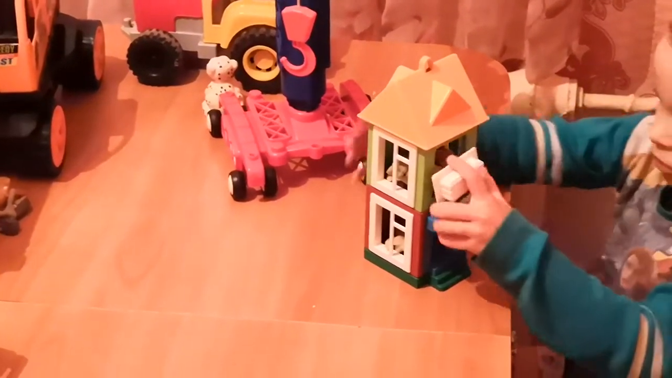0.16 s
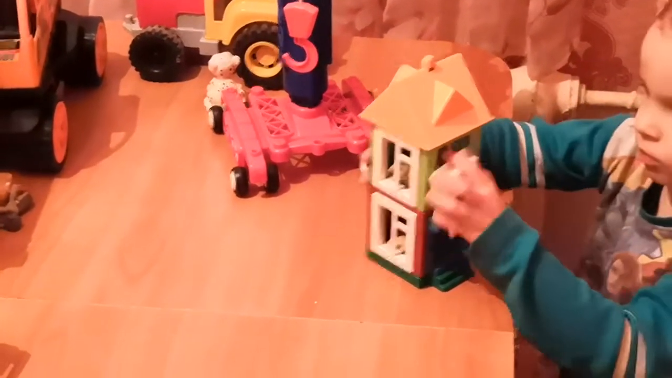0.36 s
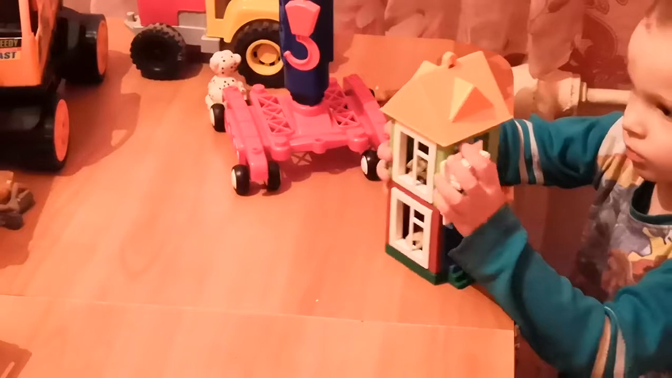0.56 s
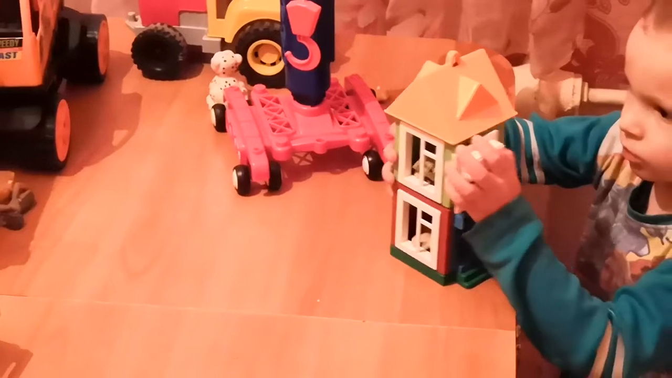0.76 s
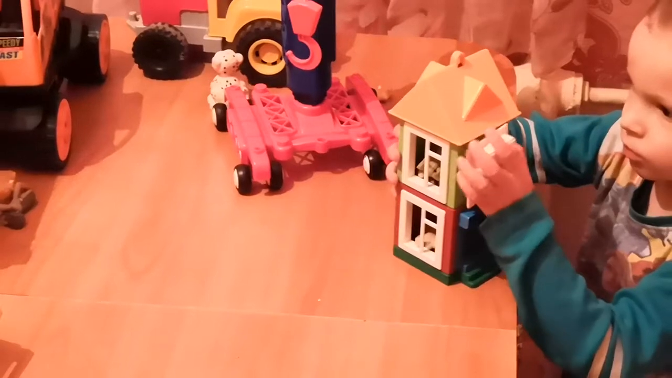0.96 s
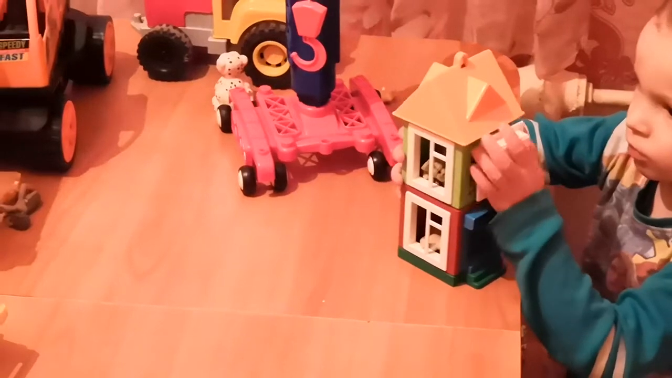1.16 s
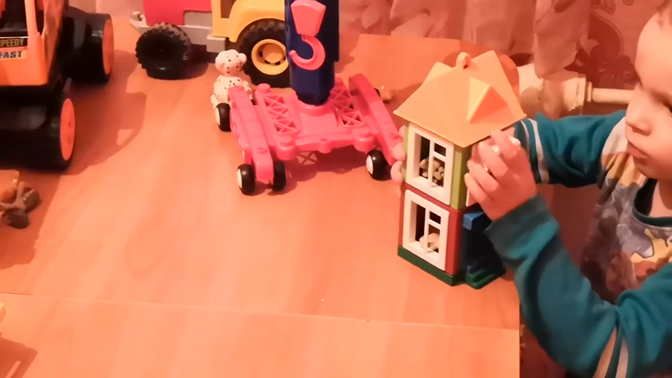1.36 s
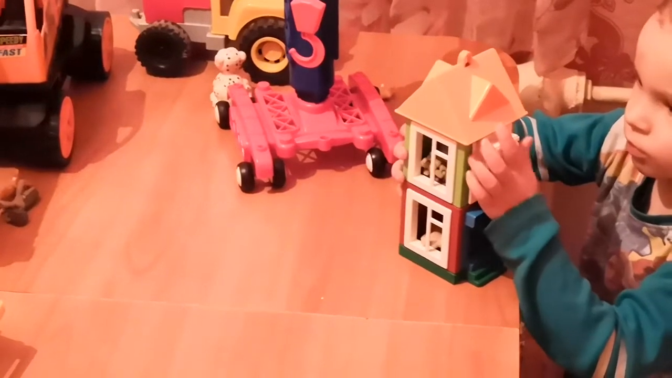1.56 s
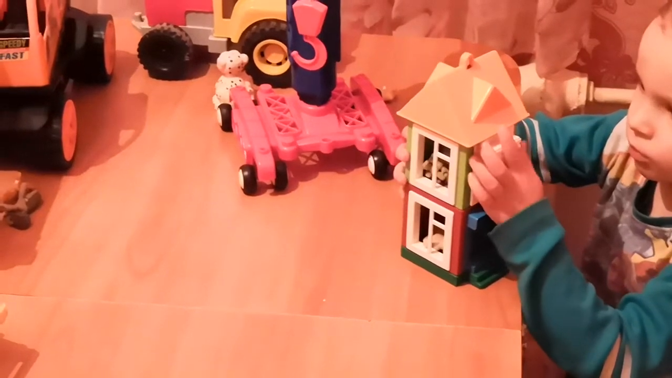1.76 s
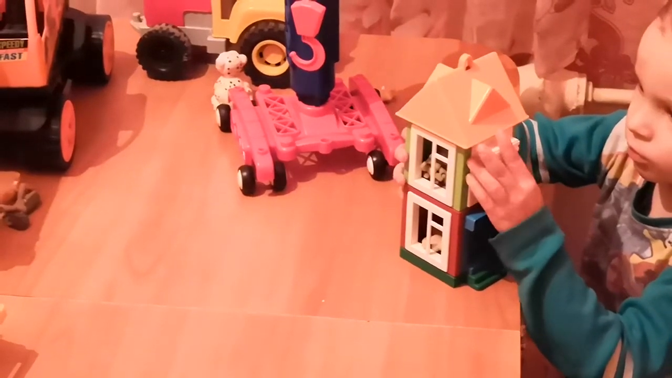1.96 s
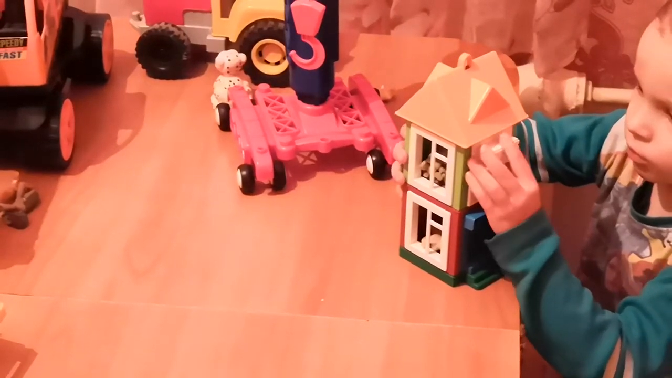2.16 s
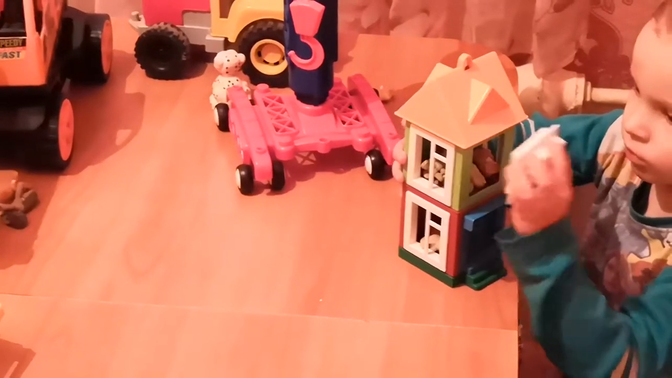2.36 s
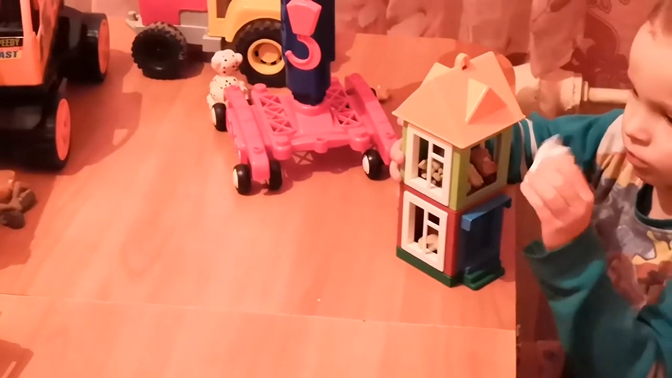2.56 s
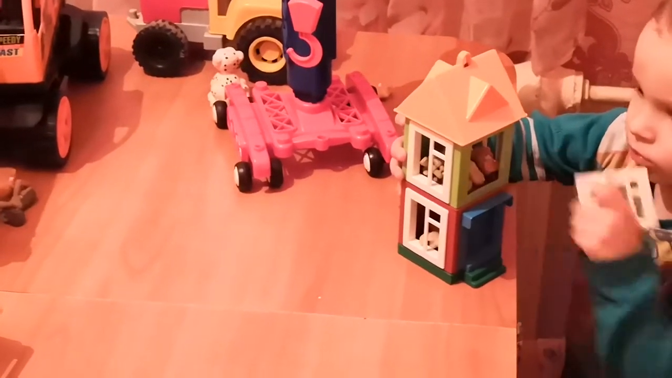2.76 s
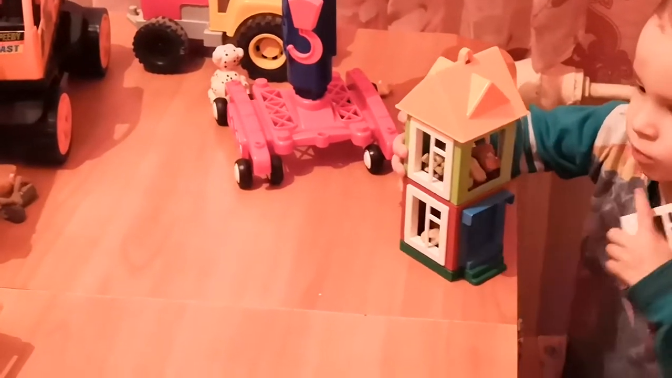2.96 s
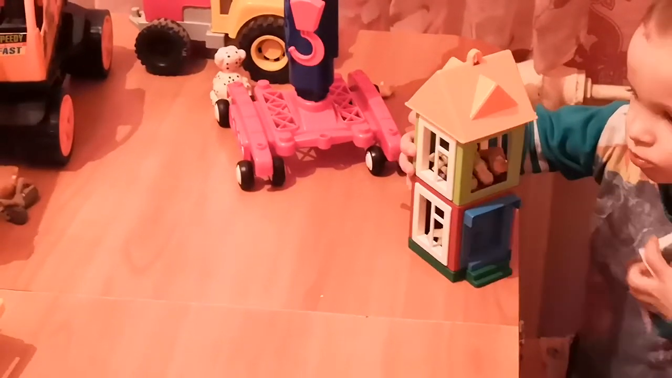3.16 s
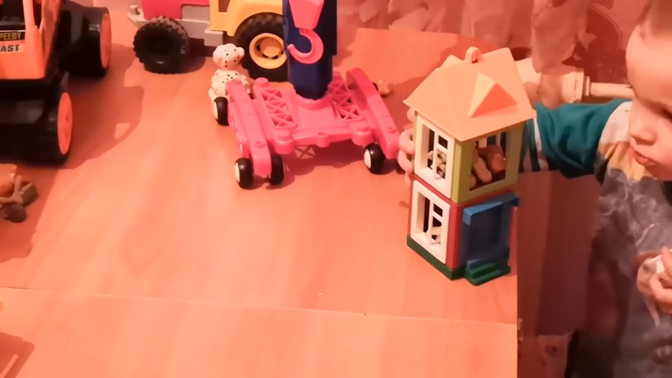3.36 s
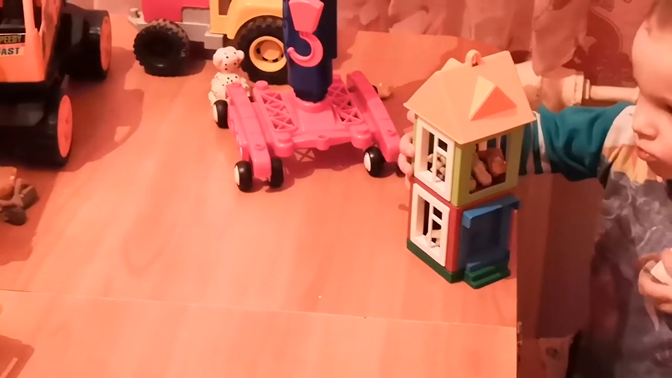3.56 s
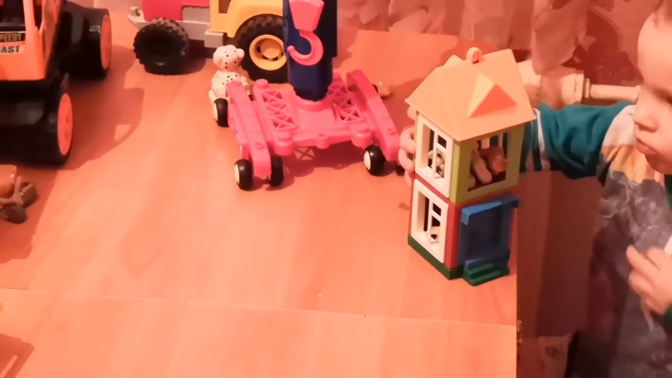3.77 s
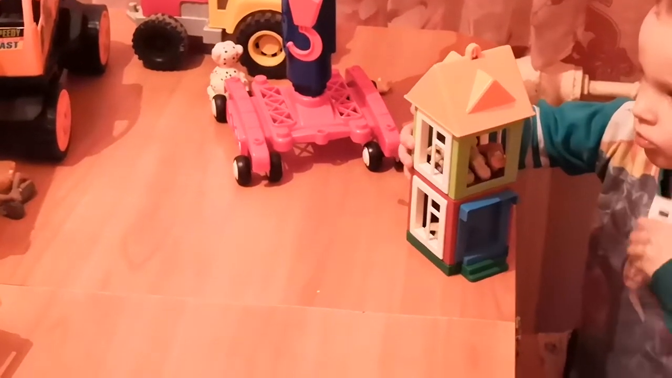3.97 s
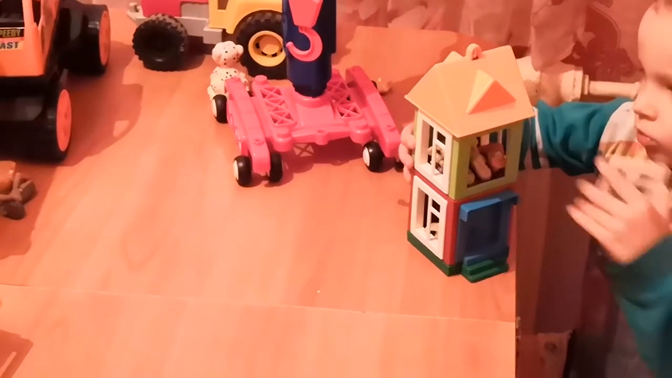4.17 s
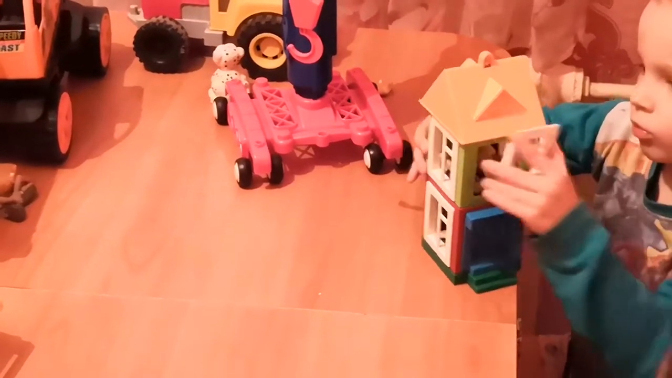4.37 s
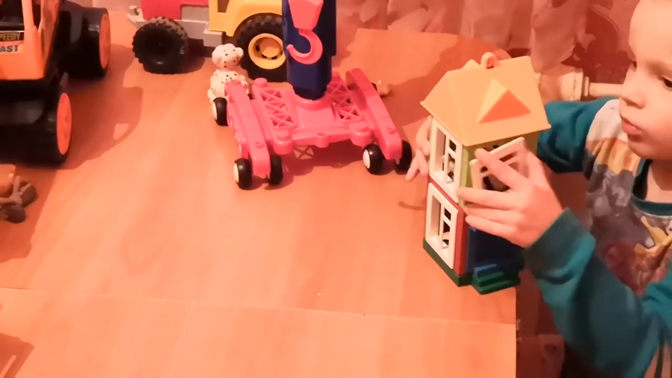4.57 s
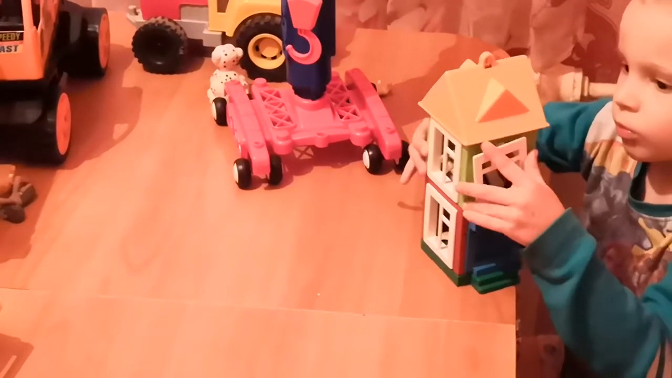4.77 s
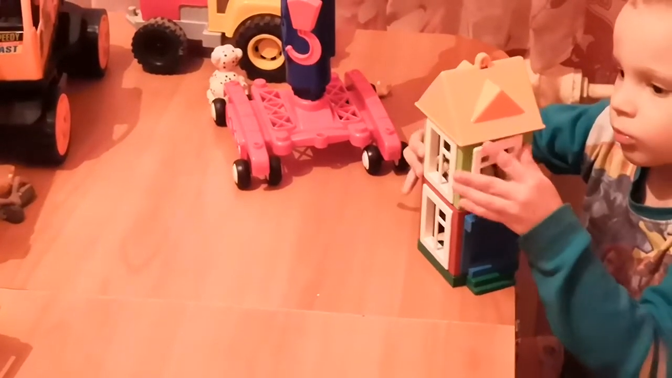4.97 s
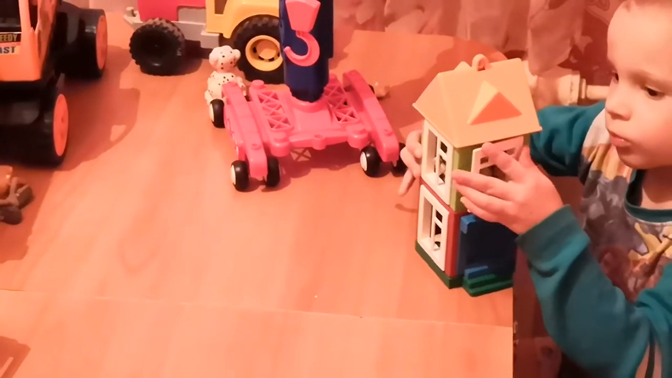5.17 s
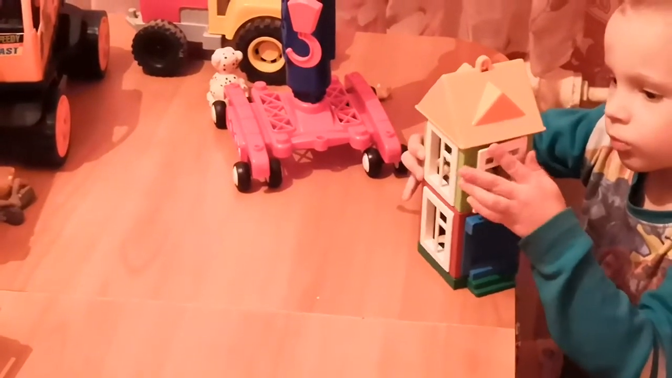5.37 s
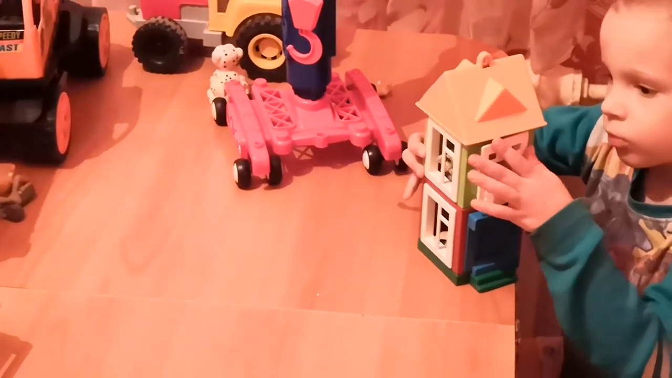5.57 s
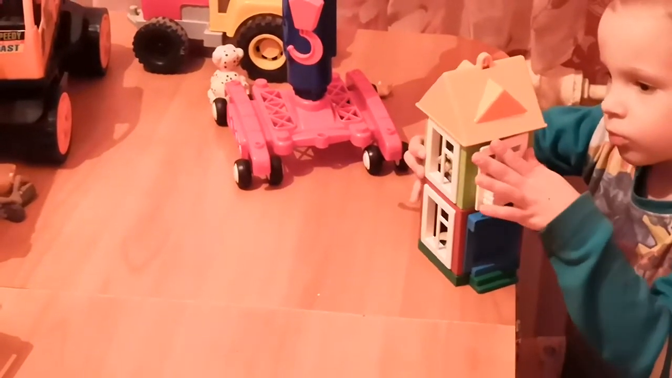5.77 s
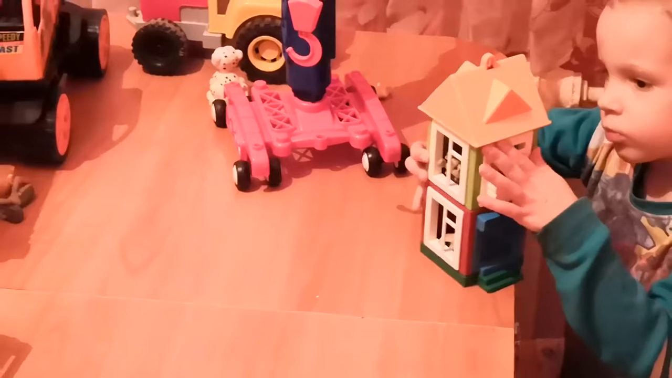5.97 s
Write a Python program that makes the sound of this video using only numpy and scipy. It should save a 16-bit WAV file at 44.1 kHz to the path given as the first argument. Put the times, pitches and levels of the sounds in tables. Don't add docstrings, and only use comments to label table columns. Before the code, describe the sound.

Small plastic frames click, snap and knock against a hollow plastic toy house on a wooden table, with soft scraping in a quiet room.

```python
import sys
import numpy as np
from scipy import signal
from scipy.fft import rfft, irfft, next_fast_len
from scipy.io import wavfile

SR = 44100
rng = np.random.default_rng(int(sys.argv[2]) if len(sys.argv) > 2 else 0)


def boost(x):
    u = np.asarray(x, float) / 20
    return 10 ** u


def transcribe(signal):
    frames = np.atleast_2d(signal).T
    limited = np.clip(frames, -1, 1)
    pcm = np.round(limited * 32767).astype(np.int16)
    wavfile.write(sys.argv[1], SR, pcm)


N = 265482

# (pitch [Hz], level [dB], time to die by 60 dB [s])
TABLE_MODES = [(65, -11, 0.034), (132.4, -11.5, 0.6), (158, -2, 0.098), (208.3, 3.5, 0.043),
               (270, -5.5, 0.11), (309.4, -11, 0.14), (355, -0.5, 0.029)]
# (pitch [Hz], level [dB], time to die by 60 dB [s])
HOLLOW_MODES = [(882, 2, 0.017), (1097, 1.5, 0.037), (1150, 1, 0.016), (1456, -1.5, 0.028),
                (1500, 12.5, 0.0043)]
# (pitch [Hz], level [dB], time to die by 60 dB [s])
SHELL_MODES = [(1863, 0, 0.022), (2000, -2.5, 0.012), (2520, 6, 0.0098), (2765, 0, 0.017),
               (2910, -7, 0.015), (3300, -15, 0.029), (3880, -3, 0.0033)]


def cut(x, hz, kind):
    return signal.sosfilt(signal.butter(4, hz, kind, fs=SR, output="sos"), x)


def at_hz(points, hz):
    points = np.array(points)
    return np.interp(np.log(hz), np.log(points[:, 0]), points[:, 1])


def rms_one(x):
    return x / np.sqrt(np.mean(x ** 2) + 1e-20)


def ring(force, hz, t60):
    r = boost(-60 / (t60 * SR))
    w = 2 * np.pi * hz / SR
    return signal.lfilter([0, np.sin(w)], [1, -2 * r * np.cos(w), r * r], force + 1e-18)


def tones(rows, rise_s=0.00067):
    out = np.zeros(N + SR)
    t = np.arange(SR // 5) / SR
    rise = np.minimum(t / rise_s, 1)
    for s, start_hz, end_hz, db, t60 in rows:
        turns = start_hz * t + (end_hz - start_hz) * t ** 2 / (2 * t[-1])
        out[int(s * SR):][:len(t)] += boost(db - 60 * t / t60) * np.sin(2 * np.pi * turns) * rise
    return out[:N]


def steady_tones(rows, rise_s):
    return tones([(s, hz, hz, db, t60) for s, hz, db, t60 in rows], rise_s)


def flicker(rate):
    knots = rng.standard_normal(int(N / SR * 40) + 2)
    smooth = signal.lfilter([1], [1, -np.exp(-2 * np.pi * min(rate, 19) / 40)], knots)
    return np.interp(np.linspace(0, len(knots) - 1, N), np.arange(len(knots)), rms_one(smooth))


def grains(per_s, spread_db):
    sizes = boost(spread_db * np.minimum(rng.exponential(1, N), 5)) * rng.choice([-1, 1], N)
    return sizes * (rng.random(N) < per_s / SR)


def strokes(rows):
    t = np.arange(0, N, 32) / SR
    db = -95
    for s, hold_s, top_db, rise_s, fall_s in rows:
        before = (s - t) / max(rise_s, .004)
        after = (t - s - hold_s) / max(fall_s, .004)
        away = np.maximum(np.maximum(before, after), 0)
        db = np.maximum(db, top_db - 20 * away)
    return boost(np.interp(np.arange(N) / SR, t, db))


def knocks():
    # (time [s], peak [dB], table thud [dB], hard edge [dB], piece pitch [Hz])
    presses = [(0.2575, -42, -11, -38, 2920), (0.305, -29, -9, -45, 1940), (0.3298, -36, -6, -43, 1560),
               (0.3591, -36.5, -28, -22.5, 2470), (0.4915, -40.5, -15, -20, 990),
               (0.633, -39.5, -14, -33, 1606), (0.7004, -68.5, 6.5, -4, 1540),
               (0.7741, -58.5, -4, -14.5, 2630), (0.9726, -52, -14.5, -23, 1410),
               (1.0156, -47, -18.5, -15.5, 1500), (1.1415, -58, -8, -22, 2680),
               (1.2273, -34.5, -13.5, -10, 2560), (1.8701, -60.5, -18, -16, 2760),
               (2.145, -47.5, -12, -54, 1260), (2.164, -40.5, -9.5, -47, 2370),
               (2.2639, -33, 1, -23.5, 1150), (3.309, -75.5, 5, -11, 1320), (4.337, -36, -43, -17.5, 1420),
               (4.5138, -37, -14.5, -14.5, 1220), (4.9105, -34, -48, -8.5, 1900),
               (5.1362, -34, -17.5, -15.5, 1370), (5.412, -61, 4, -28, 1040),
               (5.8067, -21.5, -28, -11, 2800)]
    # (time [s], peak [dB], table thud [dB], hard edge [dB], piece pitch [Hz])
    bumps = [
        (0.0, -57, -4, -15.5, 1410),
        (0.3985, -47.5, -0.5, -10.5, 1070),
        (0.7476, -60.5, -6, -14.5, 1070),
        (0.8694, -77.5, 10, -7, 900),
        (1.2074, -56.5, 8, -14, 1420),
        (1.447, -57.5, -0.5, -34, 1440),
        (2.2577, -45.5, 14, -15.5, 1000),
        (4.4823, -55.5, -39, -37, 970),
        (4.7075, -54.5, -6.5, -5, 1740),
    ]
    # (time [s], peak [dB], table thud [dB], hard edge [dB], piece pitch [Hz])
    ticks = [(0.1037, -60, -6.5, -21, 1650), (0.2975, -37, -19, -23, 2130), (0.536, -53, -26, -8.5, 2120),
             (2.5847, -71, -20, -4, 2350), (3.6533, -50, -11, -15, 2900), (3.6997, -58.5, 5, -6, 3040),
             (3.7785, -45, -18.5, -8, 2300), (4.0458, -51, -39, -16, 2100),
             (4.1785, -47.5, -5.5, -21, 2030), (5.005, -47.5, -34, -4, 2370), (5.52, -75, -22, -2, 2630)]
    # (pitch [Hz], level [dB], time to die by 60 dB [s])
    edge_modes = [(3860, 10, 0.0058), (5430, 15.5, 0.0014), (7650, 7.5, 0.0013), (7326, 0, 0.025),
                  (9250, 7.5, 0.0046), (10900, -34, 0.0013), (13100, -36, 0.0032)]

    kinds = (presses, -6.5), (bumps, 3.5), (ticks, -37)
    contacts = sorted((*row, db) for rows, db in kinds for row in rows)
    s, peak_db, thud_db, edge_db, pitch, hollow_db = np.transpose(contacts)

    late = np.sort(rng.random((len(s), 10)) ** 3, axis=1) * .016
    late -= late[:, :1]
    at = ((s[:, None] + late) * SR).astype(int)
    fade = boost(-60 * late / .03) * np.minimum(.4 + late / .002, 1)

    def struck(modes, part_db):
        out = np.zeros(N)
        for hz, level_db, t60 in modes:
            luck = rng.standard_normal(late.shape) * fade
            if modes is TABLE_MODES:
                luck[:, 1:] *= .2
            luck /= np.sqrt(np.sum(luck ** 2, axis=1, keepdims=True))
            force = np.zeros(N + SR)
            np.add.at(force, at, boost(peak_db + part_db + level_db)[:, None] * luck)
            out += ring(force[:N], hz, t60)
        return out

    table = struck(TABLE_MODES, thud_db - 4)
    hollow = struck(HOLLOW_MODES, hollow_db + 0.5)
    shell = struck(SHELL_MODES, -4)
    edge = struck(edge_modes, edge_db + 2.5)
    piece_db = peak_db + 2 + np.where(pitch < 1600, hollow_db, 0)
    piece = tones([(t0, hz, hz, db, .012) for t0, hz, db in zip(s, pitch, piece_db)])

    thud = cut(cut(table, 700, "low"), 152.0, "high")
    body = cut(hollow + piece, 680, "high") + cut(shell, 1020, "high")
    click = cut(cut(edge, 2470, "high"), 19800, "low")
    return cut(thud + body + click, 11600, "low")


def clacks():
    # (time [s], pitch [Hz], level [dB], time to die by 60 dB [s])
    touches = [(0.098, 1650, -50.5, 0.022), (.150, 1500, -57, 0.023), (.140, 9380, -66, .03),
               (.681, 1500, -46, 0.013), (.752, 1076, -50, 0.054), (.874, 1360, -64, .02),
               (.875, 780, -53.5, 0.014), (.970, 2720, -50.5, 0.025), (1.031, 1500, -42, 0.014),
               (2.144, 2960, -51, 0.036), (2.166, 2980, -44, 0.034), (2.167, 1300, -42, 0.025),
               (2.264, 2660, -50, 0.01), (2.261, 1090, -28, .025), (2.262, 1800, -38, 0.015),
               (2.294, 1060, -26.5, 0.014), (4.201, 1125, -60, 0.38), (4.251, 2467, -43, 0.05),
               (4.29, 1070, -63, .08), (4.343, 1405, -29, 0.038), (4.365, 2670, -33, 0.019),
               (4.483, 3420, -57, 0.071), (4.487, 1080, -48, 0.06), (4.52, 1370, -39, 0.015),
               (5.137, 1960, -24, 0.01), (5.138, 2540, -27, 0.0053), (5.175, 1630, -52, 0.008),
               (5.204, 1500, -53, 0.015), (5.209, 1120, -66, 0.014), (5.814, 2930, -30, 0.02),
               (5.808, 10450, -16, 0.004), (5.808, 12100, -24.5, 0.0047), (5.808, 14300, -30, 0.0041),
               (5.825, 1434, -30, 0.035), (5.826, 3860, -34, 0.014), (.256, 3080, -51, .015),
               (.299, 3420, -42, 0.0073), (0.307, 1000, -36, 0.017), (.365, 3140, -43, 0.018),
               (2.262, 3370, -47, 0.0084), (2.286, 2400, -44, 0.013), (4.338, 1825, -32, 0.027),
               (4.911, 1900, -46, 0.016), (4.912, 2630, -32, 0.015), (5.006, 2200, -38, .004)]
    return cut(steady_tones(touches, rise_s=0.00076), 660, "high")


def dry_snaps():
    # (time [s], pitch [Hz], level [dB], time to die by 60 dB [s])
    snaps = [(.2595, 2960, -54, .01), (0.259, 139, -42, 0.19), (0.306, 2000, -28, 0.0084),
             (0.324, 1580, -25.5, 0.019), (.337, 2150, -23, 0.0072), (0.363, 2730, -24, 0.006),
             (0.6328, 4230, -31, 0.003), (.705, 7800, -51, 0.0036), (1.228, 2750, -15.5, 0.0048),
             (1.017, 1550, -36, 0.02), (1.448, 9700, -36, 0.0026), (3.312, 70.4, -49.5, 0.024),
             (3.654, 5430, -37, 0.0044), (3.693, 174, -38.5, 0.07), (3.78, 7000, -40, .005),
             (4.047, 9200, -41, .003), (4.178, 5600, -42.5, 0.0047), (4.171, 65, -43, 0.035),
             (4.336, 3040, -18.5, 0.0046), (4.912, 2980, -24, 0.0053), (5.0067, 2810, -18.5, 0.0025),
             (5.006, 3950, -29, 0.0051), (5.137, 2830, -19.5, 0.0044), (5.808, 3300, -11, 0.0084),
             (5.808, 1970, -15, 0.012), (5.808, 7080, -10, 0.0032), (5.809, 13000, -29, .0012),
             (5.818, 2870, -36, 0.014), (5.828, 124.7, -43, 0.34), (.001, 2980, -50.5, 0.029),
             (.001, 1670, -39, 0.019), (.145, 2770, -61, 0.027), (0.334, 1500, -33, 0.014),
             (.345, 1150, -22, 0.0088), (0.404, 1150, -37, 0.011), (0.492, 3160, -33.5, 0.0092),
             (.495, 1000, -36, 0.023), (0.537, 1870, -42, 0.016), (1.233, 2270, -21.5, .01),
             (1.246, 1385, -28, 0.017), (4.714, 1074, -42, 0.038), (4.901, 2440, -43, 0.039),
             (4.918, 1042, -34.5, 0.064), (4.926, 2400, -36, 0.017), (4.964, 1240, -38, 0.022),
             (5.146, 1465, -27.5, 0.02), (5.146, 1110, -24, 0.013), (5.158, 1150, -32, .02),
             (5.808, 1600, -21.5, 0.025), (5.813, 1067, -23.5, 0.12)]
    return cut(steady_tones(snaps, rise_s=0.00038), 12700, "low")


def base_thumps():
    # (time [s], pitch [Hz], level [dB], time to die by 60 dB [s])
    landings = [(.326, 173, -34.5, 0.082), (.318, 324, -44.5, 0.1), (.36, 74.6, -47, .15),
                (.51, 273, -52.5, 0.077), (.75, 310, -55, 0.093), (.765, 245, -61, 0.065),
                (0.979, 265, -61, 0.22), (1.03, 375, -59, .06), (2.37, 240, -38, 0.02),
                (4.79, 251, -62, 0.11), (5.25, 59.7, -56, 0.082), (2.262, 204, -30, 0.11),
                (2.276, 389, -38, 0.08)]
    return cut(steady_tones(landings, rise_s=0.00038), 12700, "low")


def frame_rings():
    # (time [s], start pitch [Hz], end pitch [Hz], level [dB], time to die by 60 dB [s])
    held_frames = [(.772, 2650, 2700, -45, 0.031), (.873, 990, 1000, -60, 0.064),
                   (2.26, 850, 790, -27.5, 0.15), (2.30, 1258, 1150, -45, 0.17),
                   (2.29, 2300, 2200, -45, .15), (2.266, 203, 185, -29, 0.1),
                   (4.34, 1414, 1100, -23.5, 0.057), (4.345, 2784, 2360, -45, 0.43),
                   (4.38, 1413, 944, -47.5, 0.68), (5.145, 1173, 1040, -31.5, 0.06),
                   (5.83, 1038, 1046, -31.5, 0.19), (5.912, 1394, 1460, -34, 0.08),
                   (0, 1347, 1360, -53, 0.16), (.09, 1363, 1350, -54, 0.092),
                   (1.236, 2460, 2420, -34, 0.086), (1.145, 2730, 2650, -58, 0.15),
                   (1.31, 1386, 1350, -48, 0.044), (4.345, 5110, 5000, -50.5, .12),
                   (4.405, 2870, 2640, -51, .12), (4.502, 3520, 3400, -49, .05),
                   (1.26, 1246, 1500, -41, 0.15), (1.865, 2670, 2660, -60, 0.11),
                   (4.44, 1211, 896, -47.5, 0.34), (5.812, 2835, 2884, -29, 0.18),
                   (5.895, 2890, 2870, -41, 0.098), (5.91, 1044, 1074, -39, 0.17),
                   (5.95, 1423, 1420, -45.5, 0.067)]
    wobble = .75 + .65 * rms_one(cut(rng.standard_normal(N), 150, "low"))
    return tones(held_frames, rise_s=0.0018) * wobble


def corner_pricks():
    # (time [s], level [dB], lowest pitch [Hz])
    corners = [(.298, -50, 2500), (.361, -47, 5000), (.401, -48, 6500), (.536, -53, 4500),
               (1.143, -58, 1200), (2.152, -59, 1000), (2.219, -50, 900), (3.553, -60, 3000),
               (3.636, -53, 2500), (3.653, -56, 3000), (3.738, -52, 3000), (3.779, -42, 2500),
               (3.844, -48, 3500), (3.866, -44, 2500), (4.046, -40, 3500), (4.484, -52, 2500),
               (4.865, -62, 3500), (4.903, -48, 1500), (5.006, -31.5, 1800), (4.178, -50, 3500),
               (.325, -41, 1500), (.372, -38, 1500), (.309, -38, 1200), (5.803, -37, 1500),
               (5.09, -44, 3000)]
    out = np.zeros(N)
    t = np.arange(SR // 50) / SR
    for s, db, low_hz in corners:
        crumb = rng.standard_normal(len(t)) * boost(-60 * t / 0.0031)
        out[int(s * SR):][:len(t)] += boost(db) * cut(crumb, low_hz, "high")
    return cut(out, 10600, "low")


def table_shoves():
    # (full from [s], hold [s], level [dB], rise [s], fall [s])
    shoves = [(.44, 0.074, -54.5, 0.067, 0.12), (.63, 0.047, -77, .08, 0.047),
              (1.25, 0.0077, -52, 0.022, 0.081), (1.85, 0.034, -71, 0.79, 0.61),
              (2.36, 0.021, -57, 0.13, 0.045), (2.42, .03, -65, .05, 0.21), (2.55, 0.18, -72.5, .2, 0.72),
              (3.04, 0.0073, -53.5, 0.15, 0.13), (3.15, 0.026, -70, .1, 0.38),
              (3.71, 0.089, -58.5, 0.2, 0.074), (3.9, 0.065, -68, 0.11, 0.04),
              (4.235, 0.024, -46, 0.12, 0.18), (4.31, 0.053, -53, 0.1, 0.086), (4.45, 0.33, -70, .1, .1),
              (4.77, 0.042, -56, 0.034, 0.15), (4.96, 0.038, -60.5, 0.19, 0.11),
              (5.085, 0.0096, -53, 0.087, 0.066), (5.18, 0.0093, -53, 0.1, 0.066),
              (5.3, .01, -67, 0.018, 0.83), (5.63, .01, -71.5, 0.41, .05), (5.79, 0.012, -64, 0.084, .03),
              (5.876, 0.049, -50, 0.059, 0.043)]
    push = grains(270, 2.05)
    rumble = rms_one(sum(boost(db) * ring(push, hz, t60) for hz, db, t60 in TABLE_MODES))
    return boost(-3) * strokes(shoves) * cut(rumble, 347, "low")


def rubbing():
    # (full from [s], hold [s], level [dB], rise [s], fall [s])
    scrapes = [(0.0, 0.0074, -52.5, .01, 0.18), (.4, .01, -44, 0.17, 0.14),
               (.5, 0.017, -40.5, 0.047, 0.057), (.7, 0.053, -54, 0.09, 0.027),
               (.98, 0.015, -53, 0.063, 0.038), (1.154, 0.11, -53.5, 0.053, .1),
               (1.28, 0.047, -62, .1, 0.15), (1.58, 0.88, -70.5, 0.28, 0.58),
               (2.31, .01, -46.5, 0.057, 0.079), (2.68, .01, -68.5, 0.17, 0.19),
               (3.014, 0.046, -52, 0.099, 0.069), (3.66, 0.0099, -62, 0.35, 0.11),
               (3.74, 0.0081, -53, 0.047, 0.065), (3.96, 0.0091, -59.5, 0.33, 0.27),
               (4.19, 0.18, -48, 0.072, .1), (4.43, 0.083, -58, .1, 0.34), (4.77, 0.044, -55, 0.058, 0.028),
               (4.92, 0.045, -46, 0.029, 0.15), (5.138, 0.0049, -31.5, 0.003, 0.022),
               (5.3, 0.011, -63, 0.018, 0.51), (5.79, 0.006, -47, 0.016, 0.021),
               (5.876, 0.051, -41, 0.029, 0.034), (5.93, 0.015, -49, 0.067, 0.028)]
    # (full from [s], hold [s], level [dB], rise [s], fall [s])
    brushes = [(.31, .01, -59, 0.1, 0.22), (.44, 0.086, -62.5, .1, 0.056), (.71, .01, -72, 0.2, .024),
               (.98, 0.0075, -56.5, 0.067, 0.045), (1.2, .01, -72, .08, .1), (1.76, 0.22, -77.5, 0.32, 0.7),
               (2.2, 0.15, -68.5, 0.22, 0.068), (2.5, 0.24, -81, 0.091, 0.21),
               (3.014, 0.04, -68.5, 0.16, 0.15), (3.16, .01, -75, .1, 0.17), (3.41, 0.011, -73, 0.11, .05),
               (3.668, 0.055, -57, 0.19, .1), (3.74, 0.021, -49.5, 0.052, .04),
               (3.87, 0.084, -47, 0.079, 0.12), (4.24, 0.16, -63, 0.26, 0.11),
               (4.52, 0.026, -54, 0.059, 0.13), (4.7, .005, -61, 0.014, 0.21),
               (4.95, 0.18, -50.5, 0.082, .05), (5.18, 0.029, -46, 0.22, 0.012),
               (5.3, 0.25, -80, .02, 0.18), (5.72, 0.091, -52, 0.035, .05), (5.86, 0.057, -54, .2, 0.048)]
    # (pitch [Hz], level per Hz [dB])
    rustle_colour = [(710, -41), (1200, -11.5), (2230, 4.5), (2460, 2.5), (2890, -2), (3350, -1.5),
                     (3690, 0.5), (4570, -4.5), (5910, -2), (7650, -7.5), (9370, -6), (12900, -22.5),
                     (15500, -28)]

    slips = grains(3000, 3.05)
    plastic = 0
    for k, (hz, db, t60) in enumerate(HOLLOW_MODES + SHELL_MODES):
        plastic = plastic + (-1) ** k * boost(db) * ring(slips, hz, 0.93 * t60)
    scrape = boost(-7.0) * strokes(scrapes) * cut(rms_one(plastic), 540, "high")

    colour = boost(at_hz(rustle_colour, np.fft.rfftfreq(N, 1 / SR) + 1))
    hiss = rms_one(irfft(rfft(grains(6000, 2.6)) * colour, N))
    rustle = boost(-1.5) * strokes(brushes) * hiss
    uneven = boost(1.5 * flicker(15))
    return uneven * (scrape + rustle)


def diffuse(size, gain_at, likeness):
    out = 0
    edges = 20 * 2 ** np.arange(0, 9.8, .5)
    white = rng.standard_normal((2, 2, size))
    for k, (low, high) in enumerate(zip(edges, np.append(edges[1:], 19000))):
        band = signal.butter(2, [low, high], "band", fs=SR, output="sos")
        mid, side = signal.sosfilt(band, white[k % 2])
        centre = np.sqrt(low * high)
        alike = np.clip(at_hz(likeness, centre), -1, 1)
        both = np.sqrt(1 + alike) * mid + np.sqrt(1 - alike) * side * [[1], [-1]]
        out = out + gain_at(centre) * both
    return out


def heard(x, wet_db):
    # (pitch [Hz], time to die by 60 dB [s])
    room_t60 = [(100, 0.33), (300, 0.5), (1000, 0.25), (2500, 0.3), (6000, 0.23), (12000, 0.14)]
    # (pitch [Hz], left-right likeness [-1 to 1])
    echo_likeness = [(60, 0.85), (130, 1), (290, 0.74), (640, 0.41), (1410, 0.23), (3100, 0.076),
                     (6820, 0.11), (15000, 0.163)]
    # (pitch [Hz], left minus right [dB])
    side_lean = [(60, 0), (180, 0), (550, -3.5), (900, -4.5), (1650, -8), (4970, -8), (9000, -8),
                 (13000, 3), (15000, -3)]
    # (pitch [Hz], level [dB])
    bounce_dip = [(330, 0), (420, -2.5), (520, -6), (640, -2.5), (800, -1.5), (950, 0)]

    t = np.arange(SR // 2) / SR
    shut = boost(-60 * np.maximum(t - 0.084, 0) / 0.27) + boost(-17)
    early = 1 + boost(1.5 - 60 * t / 0.021)
    onset = np.clip((t - .002) / 0.00017, 0, 1)
    tail = diffuse(len(t), lambda hz: boost(-60 * t / at_hz(room_t60, hz)), echo_likeness)
    tail = tail * shut * early * onset
    tail = tail / np.sqrt(np.sum(tail ** 2) / 2) * boost(wet_db)

    size = next_fast_len(N + len(t))
    hz = np.fft.rfftfreq(size, 1 / SR) + 1
    lag = 27 / SR / (1 + (260 / hz) ** 4)
    direct = np.exp(-2j * np.pi * hz * lag * [[1], [0]])
    lean = at_hz(side_lean, hz) / 2 * [[1], [-1]]
    shade = boost(at_hz(bounce_dip, hz) + lean)
    return irfft(rfft(x, size) * (direct + rfft(tail, size)) * shade, size)[:, :N]


def room_tone():
    # (pitch [Hz], level [dB])
    floor_colour = [(12, -29), (20, -0.5), (44, -2), (142, -16), (234, -21.5), (485, -22), (1120, -25),
                    (1220, -38), (1710, -16.5), (2600, -24.5), (4180, -30), (8410, -35.5), (9400, -43.5),
                    (14700, -38), (16000, -48)]
    # (pitch [Hz], left-right likeness [-1 to 1])
    floor_likeness = [(60, 0.94), (130, 1), (290, -1.5), (640, -0.2), (1410, 0.3), (3100, -0.077),
                      (6820, 0.1), (15000, -0.18)]
    swell = flicker(6.4)
    hum = diffuse(N, lambda hz: boost(at_hz(floor_colour, hz) + swell + flicker(10.0)), floor_likeness)
    return boost(-67.5) * rms_one(hum)


def scene():
    roomy = knocks() + clacks()
    near = dry_snaps() + base_thumps() + frame_rings() + table_shoves() + rubbing()
    out = heard(roomy, wet_db=3.5) + heard(near, wet_db=-3.5)
    return out + heard(corner_pricks(), wet_db=-6.0) + room_tone()


def roll_off(x):
    return signal.sosfilt(signal.butter(12, 15750, fs=SR, output="sos"), x)


def record(dry):
    return roll_off(cut(dry, 50.2, "high"))


dry = scene()
out = record(dry)
transcribe(out)
```